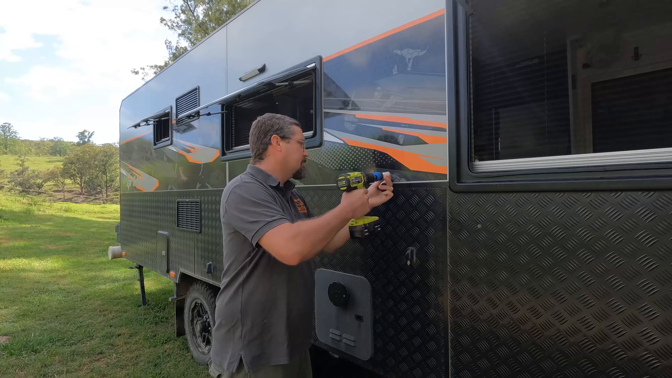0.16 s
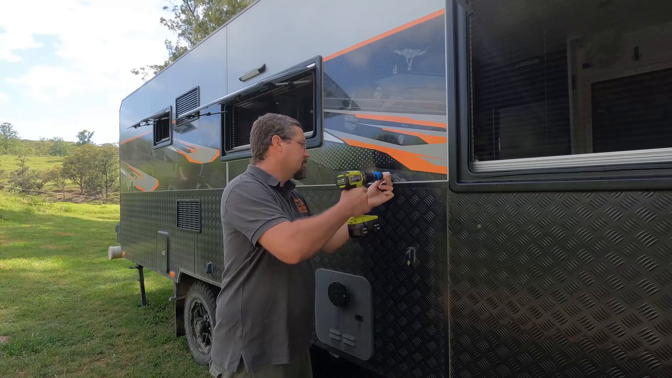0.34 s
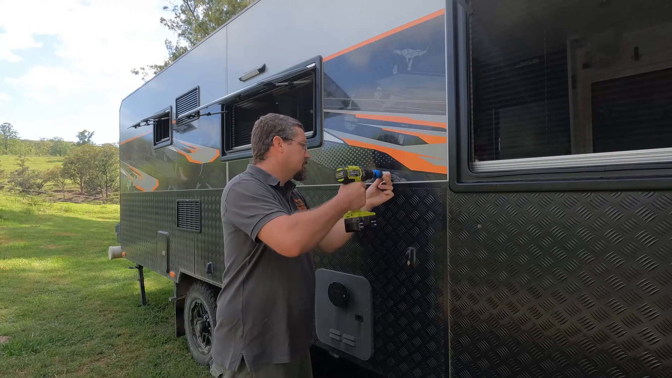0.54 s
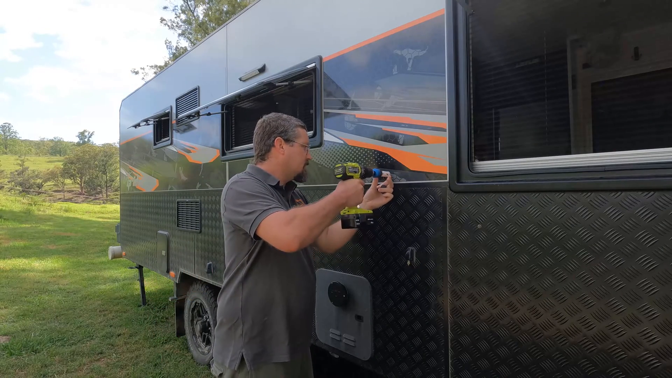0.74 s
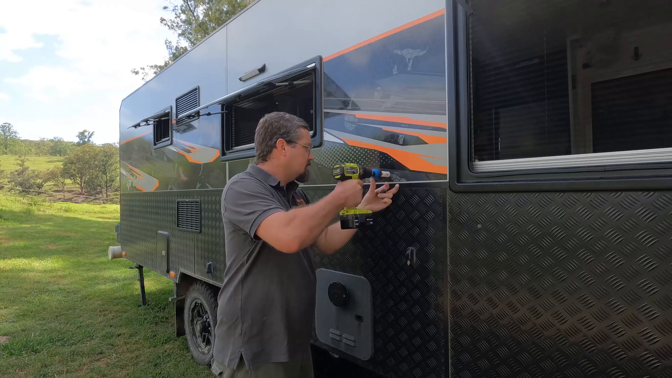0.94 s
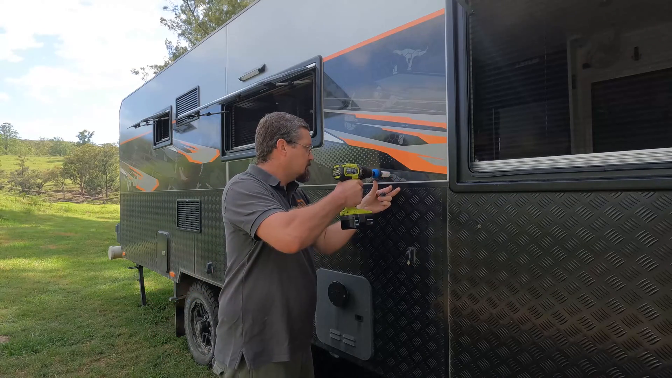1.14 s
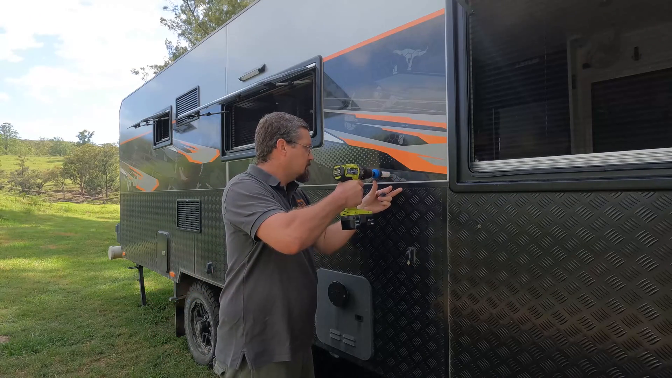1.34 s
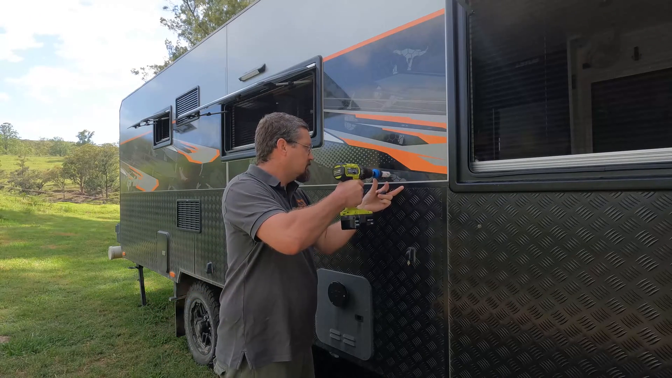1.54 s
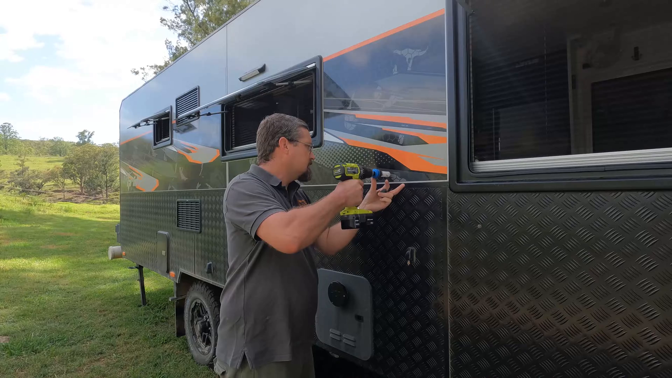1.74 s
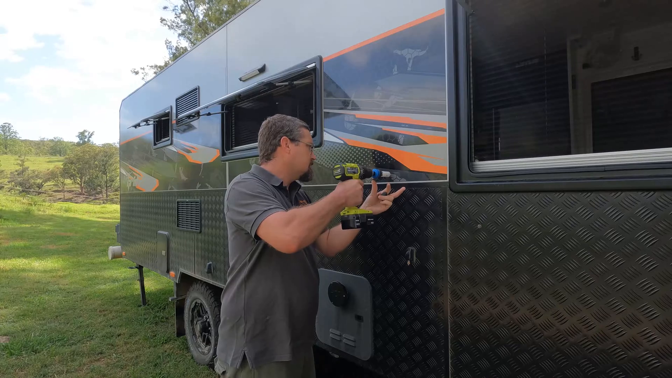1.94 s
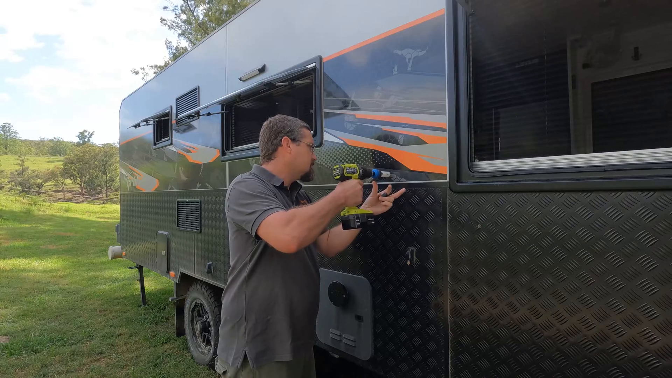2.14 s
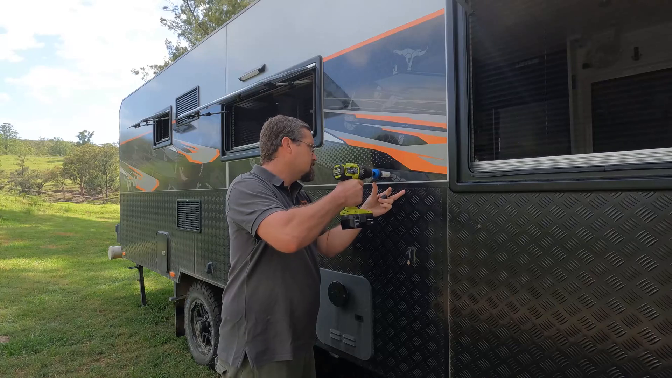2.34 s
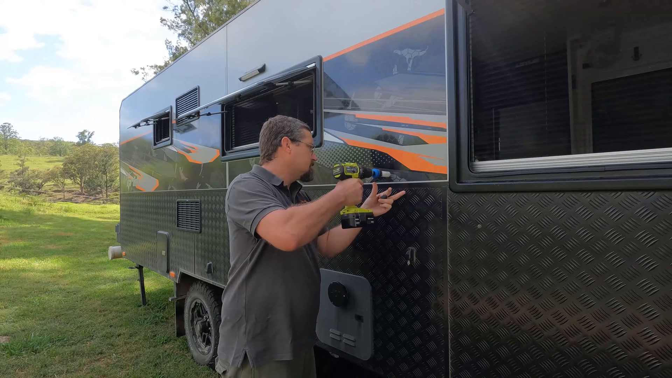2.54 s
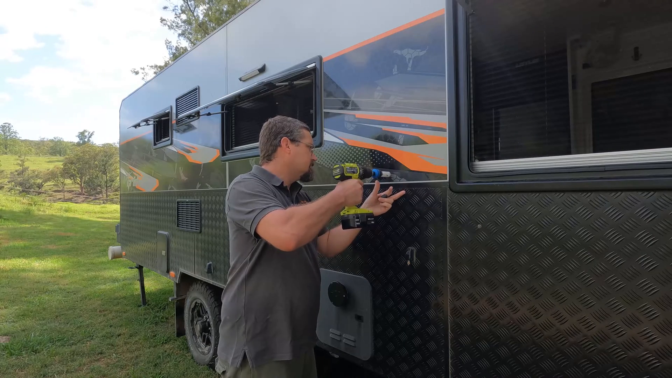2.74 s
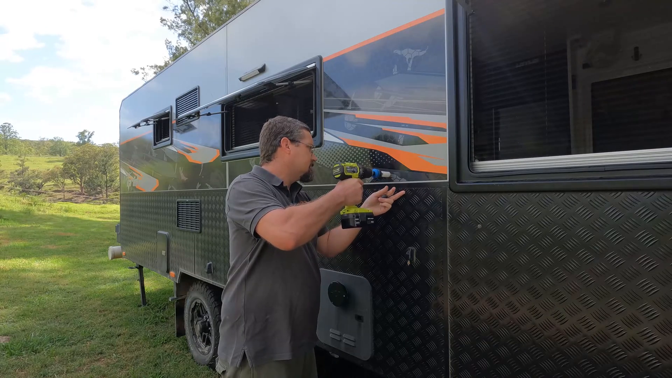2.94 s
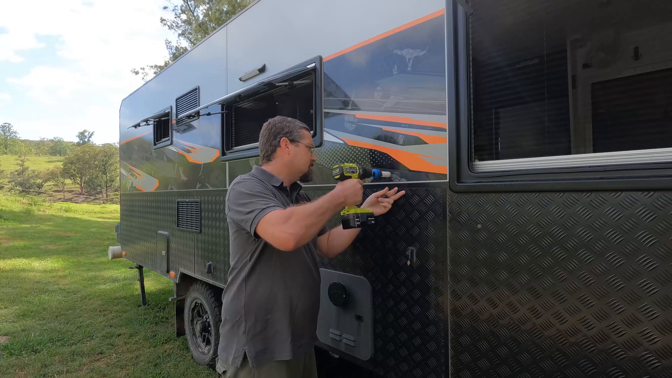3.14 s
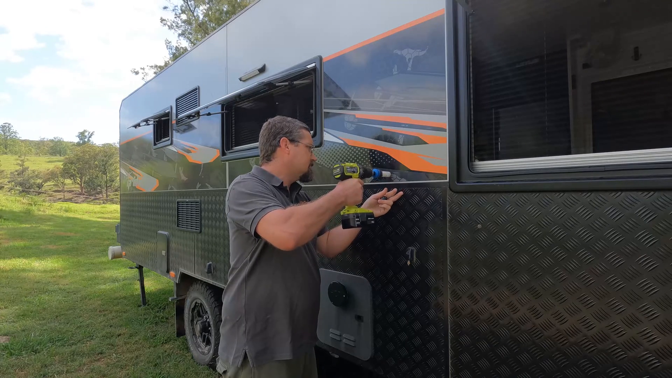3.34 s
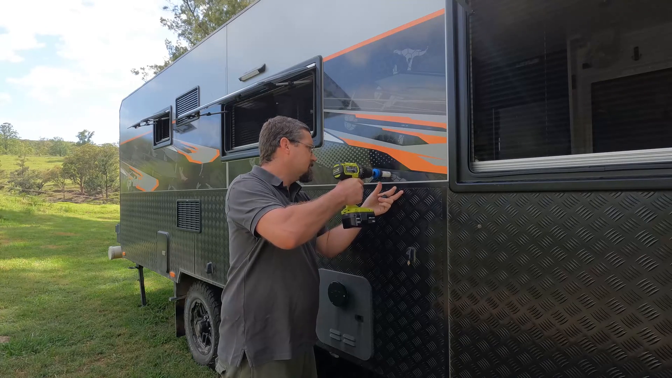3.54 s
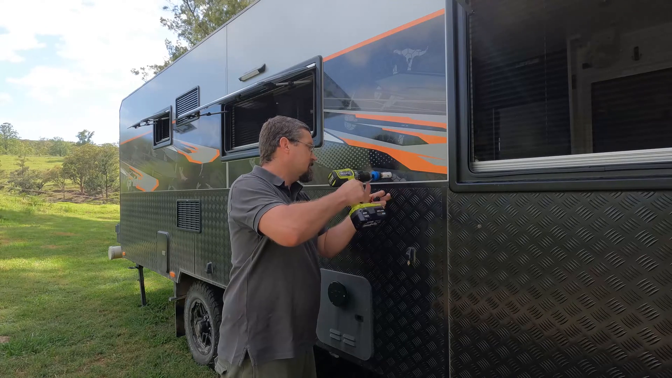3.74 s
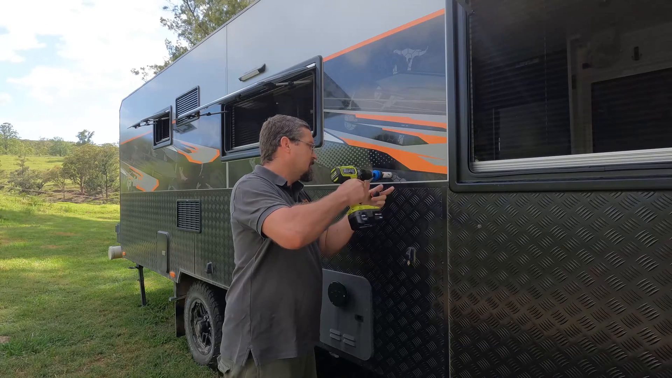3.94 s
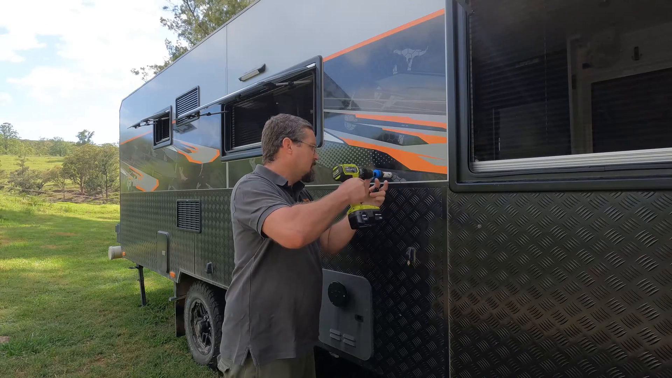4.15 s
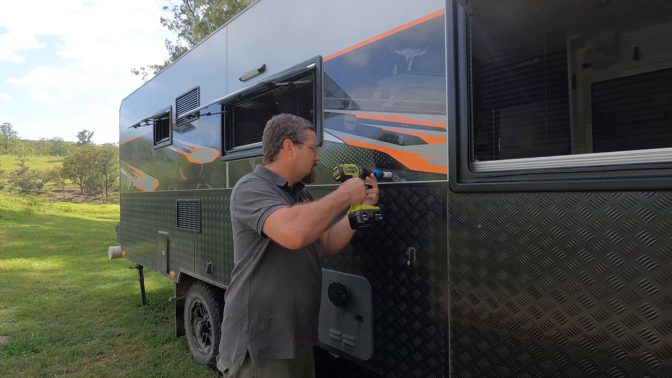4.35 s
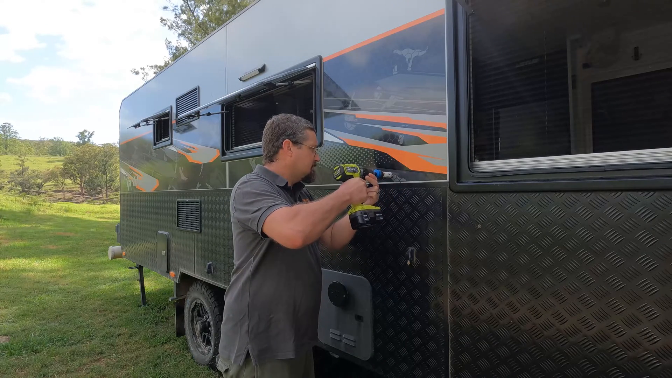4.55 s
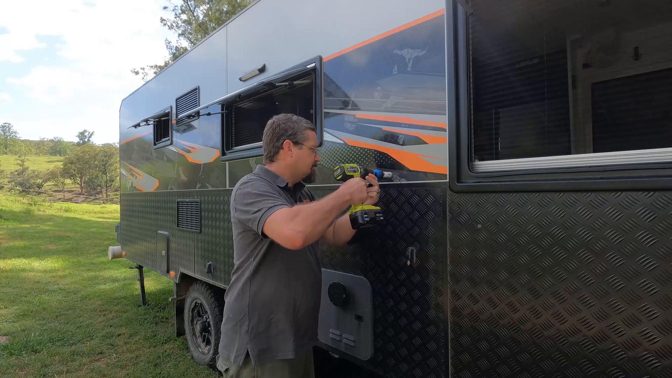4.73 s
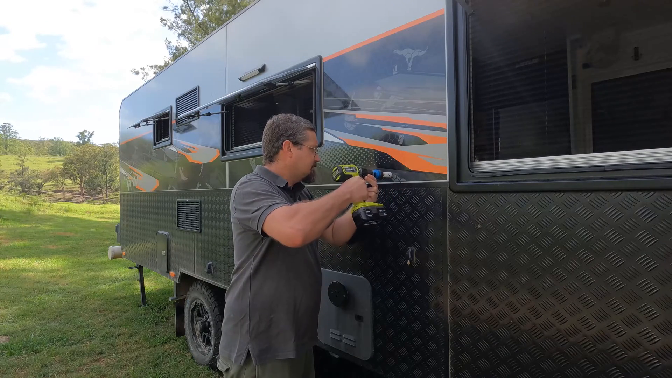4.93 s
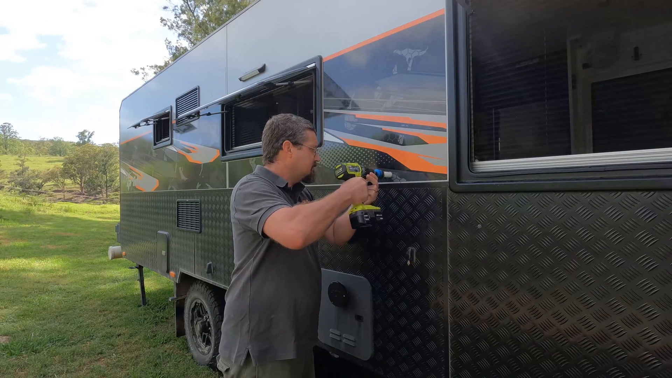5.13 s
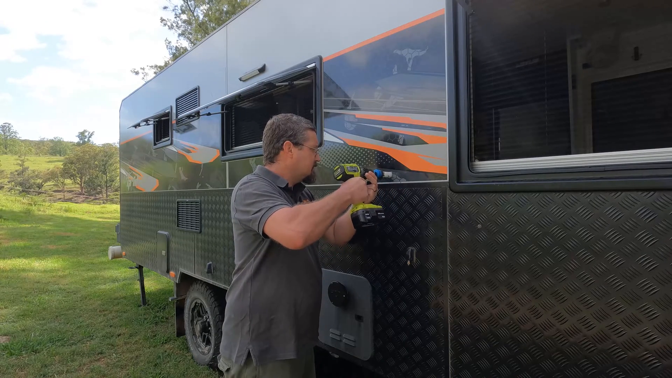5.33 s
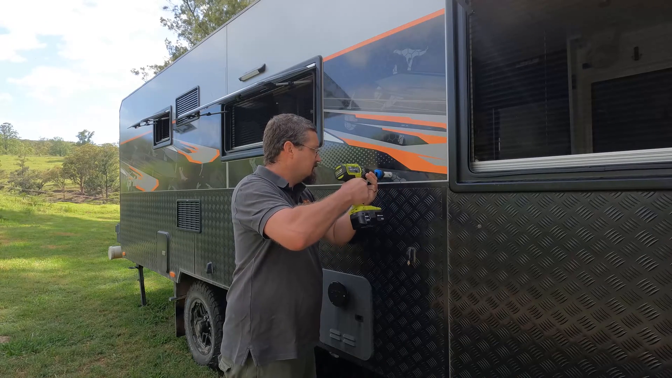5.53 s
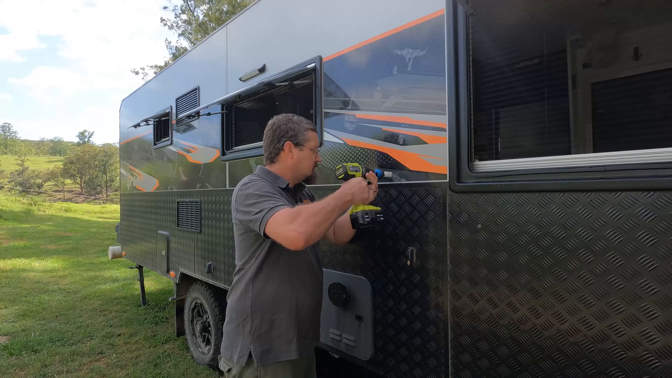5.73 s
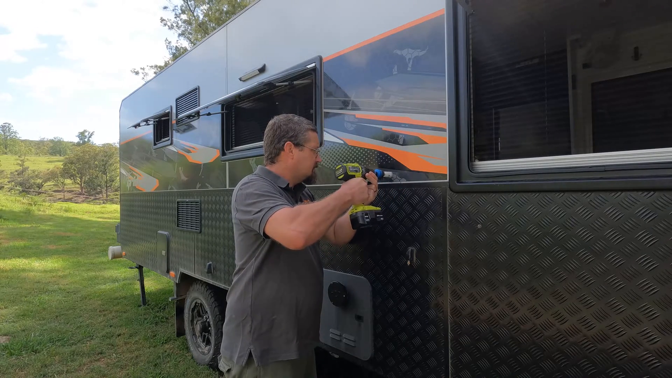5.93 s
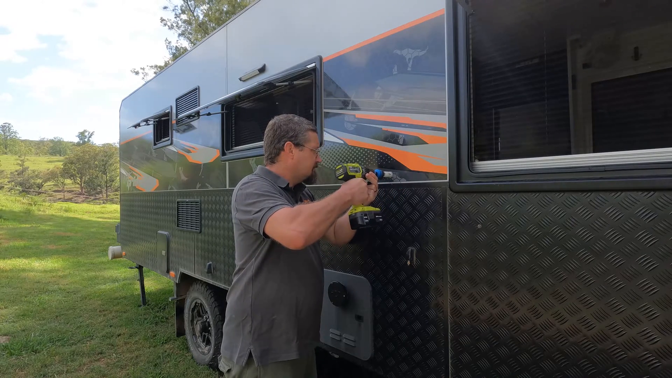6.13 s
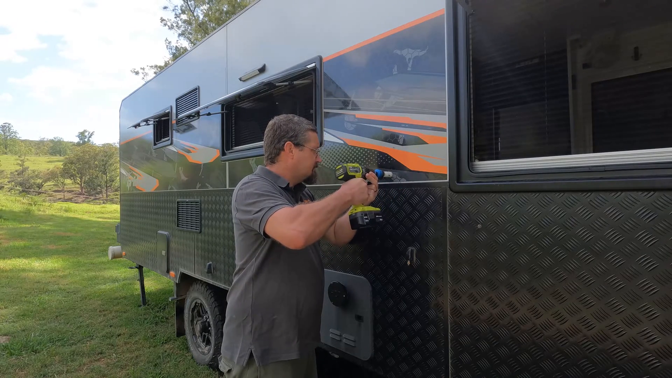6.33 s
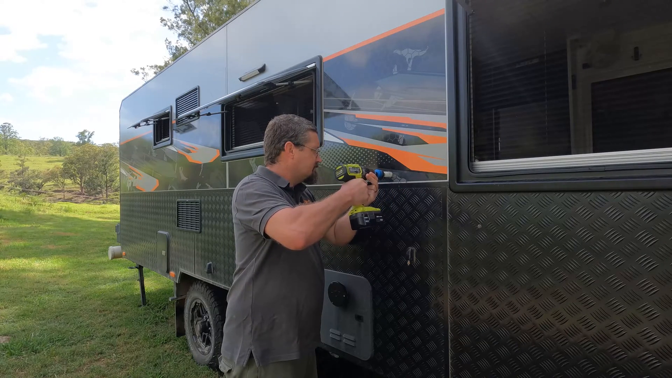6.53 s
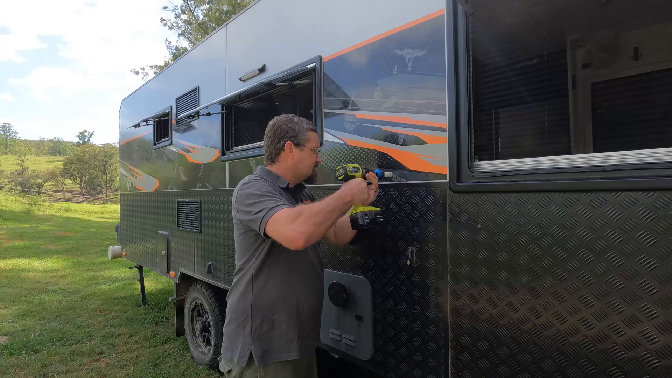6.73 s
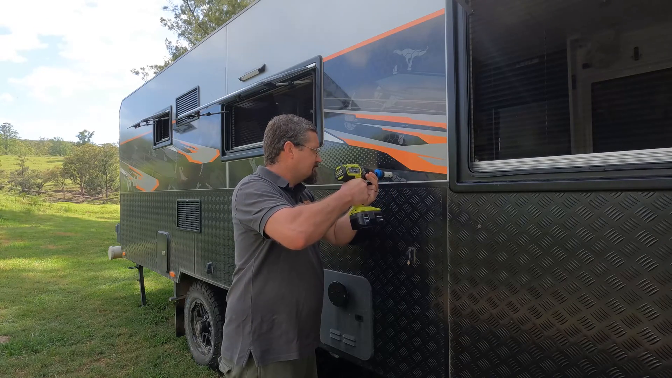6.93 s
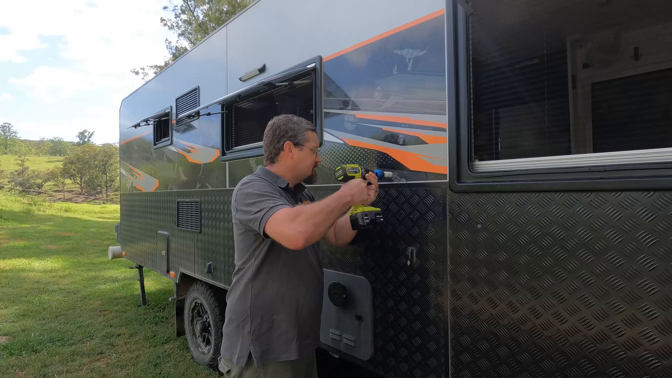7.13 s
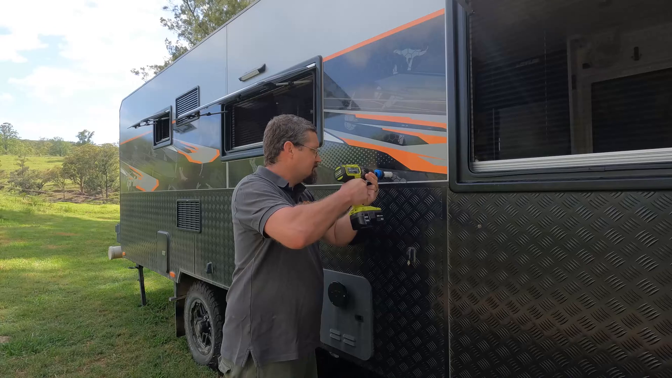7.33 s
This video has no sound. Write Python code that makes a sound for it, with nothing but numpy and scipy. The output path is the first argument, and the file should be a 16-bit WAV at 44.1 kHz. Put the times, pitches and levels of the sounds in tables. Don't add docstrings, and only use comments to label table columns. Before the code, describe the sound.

Open paddock, close dry microphone: for the first 1.2 seconds only soft air, hissing leaves, distant insects and faint falling cricket chirps, with a tiny tick near 0.7. At 1.2 a sharp clack of gear slack starts a cordless drill; its hole saw crawls with a thin electric whine and gritty scraping on a thin wall. It bites harder near 1.95, then leaps at 2.2 to a loud, high whine with harsh metallic rasp. Pitch sags from about 2.8 as the cut loads up, until at 3.73 the saw jams: a hard bang, booming panel, brief squeals, over by 4. Small ticks, faint insects and cricket follow. From 4.97 irregular clacks and slow grinding creep along, quickening at 5.7. At 6.0 it surges with a squeal into a higher, rougher, clipping scream, dipping slightly around 6.4, and holds to the end at 7.4.

```python
import sys
import numpy as np
from scipy import signal
from scipy.fft import rfft, irfft, next_fast_len
from scipy.io import wavfile
from scipy.ndimage import uniform_filter1d

SR = 44100
rng = np.random.default_rng(int(sys.argv[2]) if len(sys.argv) > 2 else 0)


def volts_from_db(level):
    exponent = np.asarray(level, float) / 20
    return 10 ** exponent


def digitize_waveform(pressure):
    field = np.atleast_2d(pressure).T
    bounded = np.clip(field, -1, 1)
    quanta = np.round(bounded * 32767).astype(np.int16)
    wavfile.write(sys.argv[1], SR, quanta)


N = 325458
T = np.arange(N) / SR

# time in seconds, free shaft speed in Hz.
TRIGGER1 = [
    (1.245, 33),
    (1.4, 37.8),
    (1.9, 38.8),
    (1.95, 63),
    (2, 75.5),
    (2.11, 81),
    (2.193, 82),
    (2.267, 255),
    (3.735, 255),
]
# time in seconds, shaft speed lost in Hz.
DRAG1 = [(2.3, 0), (2.37, 3.8), (2.55, .6), (2.72, .6), (3.15, 8.6), (3.33, 14), (3.53, 7.7), (3.66, 10.4),
         (3.7, 19)]
# time in seconds, pressure in dB.
PRESS1 = [(1.25, 32), (1.33, 13), (1.95, 6), (2.05, 7.5), (2.25, -1), (2.42, -2), (2.84, 2.5), (3.68, 1),
          (3.73, 10)]
# full-speed level in dB, dB per dB of speed, dB per dB of pressure, strain in dB.
LAWS1 = [(-20, 0.99, 0.15, 3.5), (-33, 2.3, 1, 0), (-25.5, 1.33, 0.21, 4.5)]


def first_run():
    return drill(TRIGGER1, DRAG1, PRESS1, LAWS1, run=1, tone_db=-0.5, gear_db=1.0,
                 switch_db=-49.5, fold_db=-45.5, rub=1.1, rim_db=-13)


# time in seconds, free shaft speed in Hz.
TRIGGER2 = [
    (4.97, 3),
    (5.3, 23),
    (5.65, 23),
    (5.73, 52),
    (5.945, 54),
    (6.005, 290),
    (6.08, 326),
    (6.25, 343),
    (7.38, 343),
]
# time in seconds, shaft speed lost in Hz.
DRAG2 = [(6.08, 0), (6.17, 5), (6.26, 5), (6.43, 9.4), (6.63, .2), (6.81, 2.8), (6.878, 7.5), (6.95, 5.9),
         (7.38, 5.9)]
# time in seconds, pressure in dB.
PRESS2 = [(4.969, -7), (5.15, 3), (5.66, 3), (5.8, 7), (5.96, 9), (6.02, 15), (6.22, 11.5), (6.5, 0.5),
          (7.38, 2)]
# full-speed level in dB, dB per dB of speed, dB per dB of pressure, strain in dB.
LAWS2 = [(-18, 0.56, 0.23, 1.9), (-24.5, 0.52, 1, 0.43), (-21, 0.84, 0.068, 3.5)]


def second_run():
    return drill(TRIGGER2, DRAG2, PRESS2, LAWS2, run=2, tone_db=-1.5, gear_db=-10.5,
                 switch_db=-50.5, fold_db=-69, rub=1.9, rim_db=-7)


# time in seconds, added pressure in dB, width in seconds.
GRABS = [
    (1.96, 11, 0.042),
    (3.24, 6, 0.055),
    (3.63, 3, 0.023),
    (5.18, 4, 0.0075),
    (5.25, 8, 0.024),
    (5.41, 4, 0.013),
    (5.74, 7, 0.052),
]


def drill(trigger, drag, press, laws, run, tone_db, gear_db, switch_db, fold_db, rub, rim_db):
    spin_up_s, strain_hz = .036, 27
    free_hz, lost_hz = track(trigger)[1][0], track(drag)[1][0]
    keep = np.exp(-1 / (spin_up_s * SR))
    shaft_hz = free_hz[0] + signal.lfilter([1 - keep], [1, -keep], free_hz - free_hz[0]) - lost_hz
    gate, (press_db,) = track(press)
    press_db = press_db + bumps(GRABS)
    speed_db = 20 * np.log10(shaft_hz / free_hz[-1])
    strain = 1 - np.exp((shaft_hz - free_hz) / strain_hz)
    cup_db, wall_db, hiss_db = (db + a * speed_db + b * press_db + c * strain for db, a, b, c in laws)
    rush = np.clip((free_hz - shaft_hz - lost_hz) / 40, 0, 1)
    jitter = (.0015 + .008 * rush) * walk(60)
    turn = 2 * np.pi * np.cumsum(shaft_hz * (1 + jitter)) / SR
    fast = np.clip((shaft_hz - 90) / 30, 0, 1)
    tone = volts_from_db(tone_db) * shaft_orders(shaft_hz, turn, rush, fast, speed_db, gear_db, run)
    slow_whine, fast_whine = switching(shaft_hz, turn)
    whine = (1 - fast) * volts_from_db(switch_db + .5 * cup_db) * slow_whine + fast * volts_from_db(fold_db) * fast_whine
    return gate * (tone + whine + cut(shaft_hz, cup_db, wall_db, hiss_db, run, rub, rim_db))


# shaft multiple, full-speed level in dB in run 1, in run 2.
POLES = [(4, 5.5, -40), (5, -40, -16), (6, -4, -28), (8, 2.5, 0), (9, -40, -14), (10, -8, -40),
         (11, -40, -18), (16, -6, -25), (20, -5, -30), (22, -40, -26), (24, -18, -40)]
# shaft multiple, dB re order 12 at a crawl, at a faster crawl.
CREEP = [(16, -20, -12), (24, 2, -22), (28, -20, -11), (32, -14, -1), (40, 1, -20), (44, -20, -14),
         (64, 3, -25), (68, 7, -25)]
# shaft multiple, dB re order 19.
RUSH = [(15, -7), (22, -15)]
# frequency in Hz, half width in Hz, level in dB.
POLE_PEAKS = [(2480, 93, -20.5), (2692, 86, -11)]
COIL_PEAKS = [(937, 39, -26), (1770, 93, -21), (2870, 69, -19.5), (4260, 142, -20)]
GEAR_PEAKS = [(2880, 150, -14), (3840, 300, -13.5), (4600, 120, -14.5), (5770, 86, -8.5), (6030, 80, -16),
              (6487, 17, -14)]


def shaft_orders(shaft_hz, turn, rush, fast, speed_db, gear_db, run):
    pole_db = swept_db(8 * shaft_hz, POLE_PEAKS) + speed_db
    coil_db = swept_db(12 * shaft_hz, COIL_PEAKS)
    coil_db = coil_db + 2.2 * 20 * np.log10(np.minimum(shaft_hz / 68.4, 1))
    coil_db = coil_db + 7 * walk(9) * (shaft_hz < 45)
    mesh_db = swept_db(19 * shaft_hz, GEAR_PEAKS) + gear_db
    shudder = walk(110)

    def order(k, db):
        own_shudder = shudder[(k * 997 + np.arange(N)) % N]
        return np.sqrt(2) * volts_from_db(db + 1.6 * walk(55) + 6 * rush * own_shudder) * np.sin(k * turn + k)

    tone = order(12, coil_db + 30 * np.minimum(rush, .4) * (shaft_hz < 62)) + fast * order(19, mesh_db)
    fan = sum(order(k, swept_db(k * shaft_hz, GEAR_PEAKS) + gear_db / 2 + db) for k, db in RUSH)
    poles = sum(order(row[0], pole_db + row[run]) for row in POLES)
    creep = sum(order(k, coil_db + np.interp(shaft_hz, [45, 65], db)) for k, *db in CREEP)
    return tone + fast * rush ** 2 * fan + fast * poles + (1 - fast) * creep


# offset in shaft multiples, level in dB.
SIDEBANDS = [(-8, -4), (-4, 2), (0, -3), (4, 2), (8, -5), (12, -4)]


def switching(shaft_hz, turn):
    chop = 2 * np.pi * 9914 * T
    spread = np.clip(shaft_hz / 36, 0, 1) ** 2
    slow = spread * sum(volts_from_db(db) * np.sin(chop + k * turn) for k, db in SIDEBANDS)
    slow = slow + volts_from_db(-4) * np.sin(2 * np.pi * 14360 * T - 8 * turn)
    slow = slow + (1 - spread) * volts_from_db(13.0) * np.sin(chop)
    fold = np.clip((shaft_hz - 170) / 40, 0, 1) * np.sin(2 * np.pi * 15020 * T - 8 * turn)
    full = np.sin(chop + 4 * turn) + volts_from_db(-1.0) * fold + volts_from_db(-12) * np.sin(chop - 4 * turn)
    return slow, full


# frequency in Hz, width in Hz, level in dB.
WALL = [(169.7, 27.7, 3), (230, 31, -4), (264, 16.3, -4.5), (343.8, 49, 3.5), (393, 10, -0.5),
        (458.5, 41, 0), (537.3, 28.6, 4), (604, 236, 4.5), (856, 10.7, -5), (937, 59, -1)]
# frequency in Hz, width in Hz, dB in run 1, dB in run 2.
CUP = [(870, 240, -5, -8), (960, 121, -3, -14), (1220, 544, -0.5, 4), (1570, 107, 2, 5),
       (1730, 153, -0.5, 4.5), (2142, 260, 0, 4), (2536, 353, 3, 6), (3050, 480, 5, 5.5), (3623, 315, 4, 6)]
HISS = [(4072, 123, 2, 3.5), (4010, 630, 1, -2.5), (4740, 1150, 3.5, -2), (5870, 520, 3, -2.5),
        (6070, 780, -0.5, -4), (7460, 720, -17, -19), (9660, 720, -20.5, -33), (13950, 4500, -44, -25)]


def cut(shaft_hz, cup_db, wall_db, hiss_db, run, rub, rim_db=-30):
    push = teeth(shaft_hz, rub)
    wall = unit(ring(push * volts_from_db(2.32 * walk(15)), WALL))
    cup = unit(ring(push, CUP, column=1 + run))
    hiss = unit(ring(push, HISS, column=1 + run))
    rim = volts_from_db(rim_db) * np.clip(1 - shaft_hz / 150, 0, 1) * unit(ring(push, [(2650, 300, 0)]))
    return volts_from_db(cup_db) * (cup + rim) + volts_from_db(wall_db) * wall + volts_from_db(hiss_db + 3.5) * hiss


def teeth(shaft_hz, rub):
    smear_s, scatter_db = .002, 3
    rate = 70 + 3.0 * shaft_hz
    catch = (rng.random(N) < rate / SR) * volts_from_db(scatter_db * rng.standard_normal(N)) / np.sqrt(rate)
    scrape = signal.lfilter([1], [1, -np.exp(-1 / (smear_s * SR))], catch)
    fill = rub * (1 + shaft_hz / 60)
    level = np.sqrt((unit(scrape) ** 2 + fill) / (1 + fill))
    return rng.standard_normal(N) * level * volts_from_db(0.23 * walk(6.6))


STALL_S, LET_GO_S = 3.725, 3.725 + .2
# time in seconds, level change in dB, width in seconds.
SLIPS = [
    (3.737, 4.5, 0.0089),
    (3.765, -1.5, 0.0082),
    (3.803, 3, 0.058),
]
# start in seconds,
# level in dB, from Hz, to Hz, length in seconds.
SQUEALS = [
    (3.765, -17, 4150, 4200, .035),
    (3.787, -11, 2800, 3150, .035),
    (3.765, -18, 3480, 3450, .035),
    (3.824, -12, 3950, 4020, .03),
    (2.25, -16, 2450, 2950, .025),
    (2.195, -22, 2500, 3050, .02),
    (6.028, -4, 3880, 4220, .028),
]


def stall():
    cup_wall_hiss_db, fall_db = (-17.5, -15, -26.5), (-39, -19.5, -36)
    end = LET_GO_S + 0.056
    gate, (fall,) = track([(STALL_S, 0), (LET_GO_S, 0), (end, 1)])
    slip_db = bumps(SLIPS)
    levels = [db + fall * drop + slip_db for db, drop in zip(cup_wall_hiss_db, fall_db)]
    after = burst(end, 1, rise_s=.004) * np.clip((end + .16 - T) / 0.041 + 1, 0, 1)
    rumble = after * volts_from_db(-42) * unit(ring(rng.standard_normal(N), WALL))
    boom = unit(ring(rng.standard_normal(N), WALL[:1]))
    boom = volts_from_db(-18 + fall * fall_db[1] + 2.1 * walk(40)) * boom
    scrape = cut(np.full(N, 90.), *levels, run=1, rub=0.9)
    return gate * (boom + scrape) + rumble + sum(glide(*row) for row in SQUEALS)


# start in seconds, peak in dB, wall in dB, ring in seconds.
CLACKS = [(1.216, -23, -12, 0.044), (1.224, -10.5, -21, 0.029), (1.228, -5, -42, 0.036),
          (1.245, -19, -22, 0.03), (3.736, 7, -8, 0.03), (3.833, -5.5, -15, 0.1),
          (4.977, -14.5, -31, 0.032), (4.997, -15, -31, 0.022), (5.029, -16, -24, 0.025),
          (5.053, -15.5, -28, 0.03), (5.074, -17, -13, 0.048), (5.099, -16, -7, 0.036),
          (5.113, -15, -14, 0.034), (5.137, -13.5, -19, 0.018), (5.151, -16, -16, 0.027),
          (5.167, -18, -20, 0.03), (5.2, -18, -13, 0.033), (5.306, -18, -17, 0.03),
          (5.357, -15, -23, 0.024), (5.371, -15, -8, 0.025), (5.42, -15, -25, 0.024),
          (5.433, -16, -30, 0.027)]
# start in seconds, level in dB, centre frequency in Hz.
TICKS = [
    (.68, -48, 6500),
    (4.042, -44, 4900),
    (4.073, -55, 7200),
    (4.099, -36, 3000),
    (4.097, -37, 1890),
    (4.51, -62, 10200),
    (5.178, -42, 11900),
    (5.255, -43, 11900),
    (5.745, -33, 11900),
]


def clacks():
    noise = rng.standard_normal(N)
    bright = unit(ring(noise, CUP + HISS + [(880, 430, 0.0092)]))
    knock = unit(ring(noise, [(2690, 410, 18.0), (4300, 790, 0), (4970, 640, -11), (1710, 440, -24)]))
    thud = unit(ring(noise, WALL))
    out = 0
    for s, db, wall_db, t60 in CLACKS:
        body = bright if s < LET_GO_S else knock
        out = out + volts_from_db(db - 7.0) * burst(s, t60) * (body + volts_from_db(wall_db) * thud)
        if s > LET_GO_S:
            out = out + volts_from_db(db - 9.5) * burst(s, 0.005) * bright
    for s, db, hz in TICKS:
        out = out + volts_from_db(db) * burst(s, 0.018) * unit(ring(noise, [(hz, 0.25 * hz, 0)]))
    return out


# frequency in Hz, density in dB per Hz.
PADDOCK = [(59, -66), (100, -40), (164, 1), (233, -4.5), (259, -3.5), (391, 3), (425, 0.5), (534, 3.5),
           (914, -1), (1920, -1), (2320, -5.5), (3430, -1.5), (6380, -17.5), (10500, -17.5), (14000, -47)]
# time in seconds, air level in dB, leaf hiss in dB.
PADDOCK_DB = [
    (0, -46.5, -4.5),
    (1.2, -45.5, -2),
    (3.9, -49, -4),
    (4.25, -50, -17),
    (4.95, -49, -15),
    (7.38, -19, -10),
]
# centre in seconds, level in dB.
CHIRPS = [(.375, -56), (.422, -50), (.468, -45), (.915, -51), (.96, -46), (1.01, -46), (4.125, -54),
          (4.172, -49), (4.63, -49), (4.68, -48)]


def paddock():
    air_db, leaf_db = track(PADDOCK_DB)[1]
    air = unit(colour(rng.standard_normal(N), PADDOCK))
    leaves = signal.sosfiltfilt(signal.butter(4, 5800, "high", fs=SR, output="sos"), air)
    out = volts_from_db(air_db + 0.54 * walk(4.3)) * (air + (volts_from_db(leaf_db) - 1) * leaves)
    wind = volts_from_db(-78.5 + 3.3 * walk(3.3)) * unit(ring(rng.standard_normal(N), [(45, 40, 0)]))
    low_insects = unit(ring(rng.standard_normal(N), [(3410, 260, 1)]))
    high_insects = unit(ring(rng.standard_normal(N), [(8600, 310, 0)]))
    insects = volts_from_db(air_db - 10.5 + 2.2 * walk(6)) * low_insects
    insects = insects + volts_from_db(air_db + 2 * leaf_db - 17.0) * high_insects
    chirp_s, chirp_hz, fall_hz = .016, 4650, 420
    cricket = sum(glide(s - chirp_s / 2, db, chirp_hz, chirp_hz - fall_hz, chirp_s) for s, db in CHIRPS)
    return out + wind + insects + cricket


def glide(s, db, from_hz, to_hz, long):
    u = np.clip((T - s) / long, 0, 1)
    cycles = long * (from_hz * u + (to_hz - from_hz) * u ** 2 / 2)
    return volts_from_db(db) * np.sin(np.pi * u) * np.sin(2 * np.pi * cycles)


def burst(s, t60, rise_s=0.00028):
    after = np.maximum(T - s, 0)
    return (1 - np.exp(-after / rise_s)) * np.exp(-np.log(1000) * after / t60)


def ring(x, modes, column=2):
    out = 0
    for k, mode in enumerate(modes):
        b, a = signal.iirpeak(mode[0], mode[0] / (1.56 * mode[1]), SR)
        twice = signal.lfilter(b, a, signal.lfilter(b, a, x))
        out = out + (-1) ** k * volts_from_db(mode[column]) / np.sqrt(mode[1]) * twice
    return out


def swept_db(hz, peaks):
    power = sum(volts_from_db(db) ** 2 / (1 + ((hz - peak_hz) / width) ** 2) for peak_hz, width, db in peaks)
    return 10 * np.log10(power)


def colour(x, table):
    hz, db = np.transpose(table)
    size = next_fast_len(N)
    bins_hz = np.arange(size // 2 + 1) * SR / size
    gain = volts_from_db(np.interp(np.log(bins_hz + 1), np.log(hz), db))
    return irfft(rfft(x, size) * gain, size)[:N]


def track(table):
    fade = .005
    s, *columns = np.transpose(table)
    gate = np.interp(T, [s[0] - fade, s[0], s[-1], s[-1] + fade], [0, 1, 1, 0])
    return gate, [np.interp(T, s, c) for c in columns]


def bumps(events):
    return sum(db * np.exp(-((T - s) / width) ** 2) for s, db, width in events)


def walk(rate):
    k = int(SR / rate)
    return 0.61 * uniform_filter1d(np.repeat(rng.standard_normal(N // k + 1), k), k)[:N]


def unit(x):
    return x / np.sqrt(np.mean(x ** 2))


def scene():
    near = first_run() + second_run() + stall() + clacks()
    tail = rng.standard_normal(SR // 8) * np.exp(-np.arange(SR // 8) / (0.008 * SR))
    mid = near + volts_from_db(-43) * signal.fftconvolve(near, tail)[:N] + paddock()
    return np.array([mid, mid])


# frequency in Hz, gain in dB.
HOUSING = [(30, -38), (90, 3.5), (150, -1.5), (8300, 1.5), (8900, -2), (9150, -28), (9400, 6.5),
           (9900, 3.5), (11200, 5), (12000, -4.5), (14300, -13), (14700, -30)]


def housing(x):
    return np.clip(colour(x, HOUSING), -1.0, 1.0)


# frequency in Hz, side minus mid in dB.
APART = [(60, -34), (110, -30), (300, -36.5), (1000, -34), (2380, -38.5), (4400, -37), (8120, -26.5),
         (15000, 1)]


def two_ports(mid):
    scatter = irfft(np.exp(2j * np.pi * rng.random(1025)))
    side = colour(signal.fftconvolve(mid, scatter * np.hanning(2048) * 1.1)[512:N + 512], APART)
    return [mid + side, mid - side]


def band_limit(x):
    return signal.sosfilt(signal.butter(12, 15810, fs=SR, output="sos"), x)


def record(dry):
    ports = two_ports(housing(dry[0]))
    top = signal.ellip(8, .1, 60, 15800, fs=SR, output="sos")
    finished = np.clip(signal.sosfilt(top, ports), -1, 1)
    return band_limit(finished)


dry = scene()
out = record(dry)
digitize_waveform(out)
```